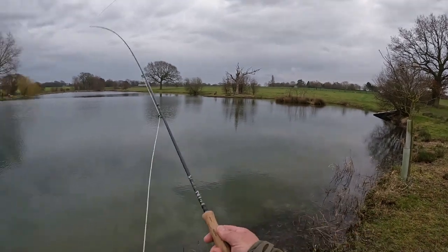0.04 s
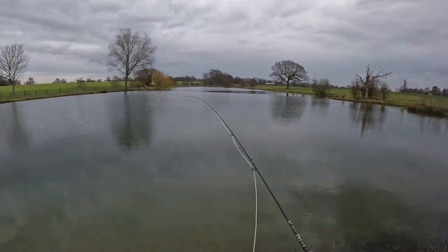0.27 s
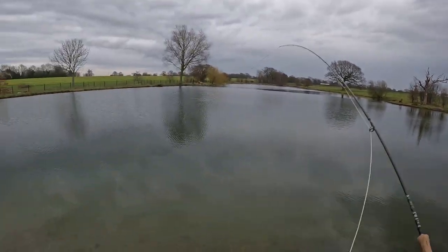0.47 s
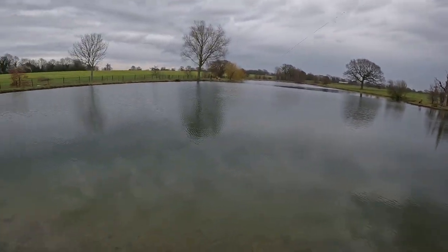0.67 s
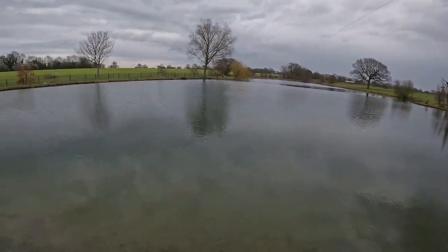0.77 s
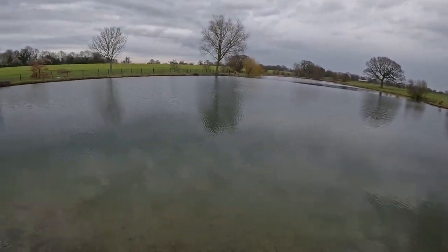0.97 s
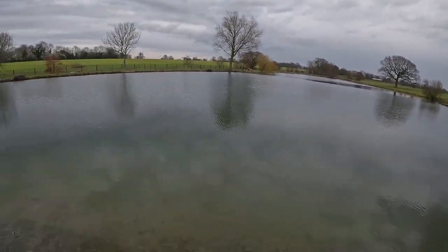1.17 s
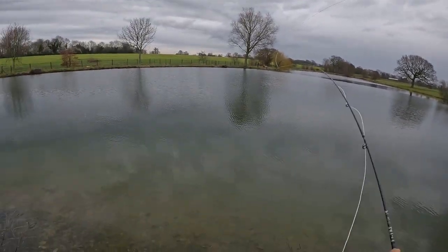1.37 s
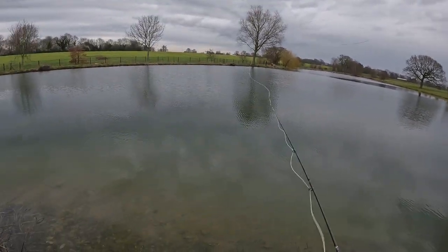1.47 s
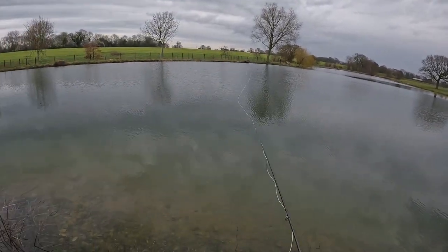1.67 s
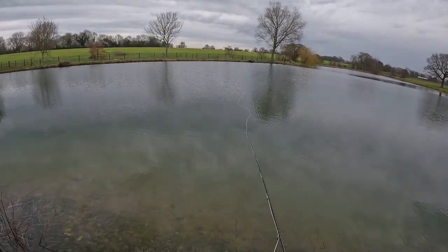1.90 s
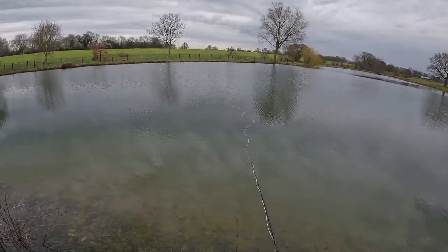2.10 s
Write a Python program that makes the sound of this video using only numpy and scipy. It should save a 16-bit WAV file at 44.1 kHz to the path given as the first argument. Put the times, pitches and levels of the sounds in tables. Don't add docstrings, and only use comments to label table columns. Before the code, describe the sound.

A fly line hisses through rod rings on the lift, goes nearly quiet with a faint swish, then shoots out louder and rougher; jacket rustles, soft knocks and wind rumble, close microphone on the caster's chest outdoors.

```python
import sys
import numpy as np
from scipy import signal
from scipy.fft import rfft, irfft, next_fast_len
from scipy.io import wavfile

SR = 44100
rng = np.random.default_rng(int(sys.argv[2]) if len(sys.argv) > 2 else 0)


def attenuation_scalar(level_db):
    decades = np.asarray(level_db, float) / 20
    return 10 ** decades


def materialize(psi):
    bounded = np.clip(np.atleast_2d(psi).T, -1, 1)
    quanta = np.round(bounded * 32767).astype(np.int16)
    wavfile.write(sys.argv[1], SR, quanta)


N = 94506

# pitch_hz, width_hz, level_db
LIFT_RINGS = [(3430, 960, -4.5), (3970, 330, -11), (4660, 870, -2), (5580, 620, -3.5), (6950, 1000, -2.5),
              (7570, 950, -8.5), (8920, 1200, -9.5)]
# pitch_hz, width_hz, level_db
SHOOT_RINGS = [(2630, 180, -2.5), (3490, 780, 3.5), (4760, 400, 2), (5000, 220, -8), (5680, 500, 0.5),
               (6620, 1760, -2.5), (8300, 520, -12)]
SLIPS_PER_S, SLIP_SPREAD_DB, RINGS_TOP_HZ = 6000, 2.5, 10330
# time_s, level_db, tilt_db_per_octave
LIFT_STROKE = [
    (0, -68.5, -2),
    (.05, -63, -7.5),
    (.16, -58, 0.3),
    (.36, -58, 0.2),
    (.5, -64, 6),
    (.58, -64.5, 5),
    (.605, -74, 4),
    (.64, -74, -9),
]
# time_s, level_db, tilt_db_per_octave
TAKE_UP_STROKE = [
    (1.16, -77.5, 11),
    (1.19, -69, 7),
    (1.215, -66.5, -10),
    (1.225, -61, 2),
    (1.29, -62, -2.5),
    (1.32, -75, -14),
    (1.34, -58, -2),
]
# time_s, level_db, tilt_db_per_octave
SHOOT_STROKE = [
    (1.3, -64, 2),
    (1.4, -56, 1),
    (1.44, -55, 8),
    (1.54, -52, -2),
    (1.56, -56.5, 1),
    (1.68, -57.5, 6),
    (1.74, -58.5, 2.5),
    (1.89, -58, -0.5),
    (1.925, -74, -23),
]
# time_s, gain_db
SNAGS = [(1.382, 2), (1.415, 5), (1.499, 4), (1.537, 3.5), (1.58, 5), (1.617, 0), (1.664, 6), (1.685, 4.5),
         (1.766, 6.5), (1.797, 6.5), (1.83, 8), (1.847, 4), (1.87, 3), (1.89, 5)]
SNAG_LENGTH_S = 0.0084
# start_s, length_s, pitch_hz, width_hz,
# level_db
RING_SONGS = [(0.042, 0.53, 13200, 4000, -78), (0.1093, 0.05, 490, 190, -56), (.3, 0.27, 3390, 300, -71.5),
              (.12, .4, 5620, 300, -65.5), (.6, .2, 5600, 580, -79), (0.046, .05, 7200, 500, -68),
              (0.326, 0.096, 4000, 170, -69), (1.53, 0.073, 115, 82, -58.5), (0.15, 0.3, 6900, 400, -68),
              (.15, 0.38, 4850, 400, -65), (.46, 0.13, 5500, 990, -71), (0.314, .2, 220, 140, -69.5),
              (0.43, 0.18, 8800, 2500, -72.5), (.55, .03, 6500, 500, -70), (1.03, 0.092, 3480, 5000, -73),
              (1.335, 0.12, 4700, 500, -64.5), (1.33, 0.081, 7300, 1700, -64),
              (1.35, 0.12, 3530, 800, -60.5), (1.41, 0.04, 6800, 300, -61), (1.415, 0.073, 8260, 700, -63),
              (1.445, 0.045, 5000, 1400, -61), (1.45, .025, 3100, 370, -62.5),
              (1.565, 0.11, 7500, 1800, -66), (1.495, 0.026, 8300, 140, -61), (1.495, .025, 7500, 400, -60),
              (1.572, 0.043, 5250, 910, -57), (1.62, 0.1, 5350, 1500, -64), (1.32, 0.63, 13000, 6000, -76),
              (1.725, .025, 2500, 130, -66), (1.76, 0.13, 6200, 1400, -61.5), (1.8, 0.08, 4640, 780, -67),
              (1.77, 0.12, 3450, 320, -64.5), (1.66, 0.075, 3600, 350, -63), (1.66, 0.026, 6100, 400, -66)]
# start_s, length_s, pitch_hz, width_hz, level_db
PUFFS = [(.21, .035, 13700, 2500, -74), (0.582, 0.027, 15100, 800, -75), (.63, 0.16, 14000, 3500, -74.5),
         (.645, .04, 5850, 500, -75), (.75, .014, 5060, 300, -76), (.778, .014, 5700, 300, -73),
         (.795, 0.022, 6200, 600, -74), (0.97, .02, 14500, 2500, -82), (1.192, 0.0022, 7500, 5000, -70),
         (1.209, 0.0022, 9500, 4000, -66), (1.223, 0.0038, 2980, 2500, -56), (1.232, .013, 13600, 600, -74),
         (1.34, 0.13, 13900, 3500, -74), (1.903, 0.0035, 6350, 3970, -59), (1.955, 0.004, 3700, 1500, -62),
         (1.978, 0.0053, 5000, 4000, -69), (2.022, 0.0048, 3560, 600, -69),
         (2.068, 0.0049, 5440, 7000, -68.5), (2.07, 0.035, 14000, 4000, -78)]
# start_s, length_s, pitch_hz, level_db
WHISTLES = [
    (.592, .038, 5800, -79),
    (.7, .05, 5560, -77),
    (.836, .05, 5480, -78.5),
]
WHISTLE_SAG_HZ_PER_S, WHISTLE_WOBBLE_HZ = 14500, 60
SWISH_START_S, SWISH_LENGTH_S = 0.52, 0.38
SWISH_HZ, SWISH_WIDTH_HZ, SWISH_DB = 5150, 2400, -70.5
# time_s, level_db
ARM = [(0, -58), (.04, -59), (.13, -57.5), (.24, -60), (.42, -68.5), (.57, -64), (.68, -61), (.8, -63),
       (.98, -67.5), (1.04, -62), (1.16, -62), (1.3, -57.5), (1.46, -57.5), (1.74, -56.5), (1.79, -60),
       (1.9, -53), (2.02, -57.5), (2.14, -52.5)]
# freq_hz, density_db_per_hz
RUSTLE = [(59, -15), (100, -1.5), (261, -6.5), (407, -6.5), (829, -10), (1230, -14), (1390, -14.5),
          (7000, -37.5), (9100, -69), (15400, -120)]
# start_s, peak_db, pitch_hz, length_cycles
KNOCKS = [(.127, -39.5, 528, 2.8), (.498, -58, 2190, 6), (0.599, -48.5, 1250, 7.6), (0.599, -52, 317, 2.8),
          (0.599, -59.5, 3360, 16), (.599, -45, 810, 2.7), (.718, -49, 380, 2), (.718, -41, 610, 2.8),
          (0.7193, -57, 1310, 7.7), (.929, -54.5, 1310, 3), (.931, -52, 630, 2.3), (1.222, -48, 188, 2.4),
          (1.585, -45.5, 1800, 7.1), (1.676, -43, 710, 2), (1.68, -50, 1900, 6.1), (1.716, -45, 1050, 2.9),
          (1.803, -53, 920, 3), (1.836, -46, 1250, 2.7), (1.966, -47, 900, 3), (2.052, -49, 735, 2.8),
          (2.076, -45, 750, 3.6), (2.1, -50, 606, 4.5), (.129, -51, 1140, 5), (.06, -47.5, 120, 3.5),
          (1.585, -45, 112, 3.6)]
THUMP_S, THUMP_HEIGHT, THUMP_RETURN_S = 1.2597, -0.026, 0.011
HOUSING_HZ, HOUSING_WIDTH_HZ, PADDING_HZ = 430, 110, 800
# time_s, level_db
GUST = [(0.0, -41), (0.31, -50.5), (0.55, -42), (0.79, -43), (1.12, -46), (1.23, -40.5), (1.38, -50.5),
        (1.62, -47.5), (1.76, -39.5), (1.92, -42), (2.14, -46.5)]
# freq_hz, density_db_per_hz
WIND = [(1.8, -0.5), (3.0, 6), (19, -3.5), (86, -20.5), (200, -42.5), (260, -71), (440, -120)]
# peak_s, half_length_s, signed_height
SHOVES = [
    (0.289, 0.007, -0.016),
    (0.972, 0.026, -0.0185),
    (1.304, 0.029, 0.051),
    (1.357, 0.023, -0.033),
    (1.974, 0.087, -0.023),
]
# freq_hz, density_db_per_hz
STEADY_HISS = [(590, -47), (1000, -11), (1220, -9), (2900, -14), (3140, -12.5), (3400, -12.5), (4140, -14),
               (15800, -22)]
STEADY_HISS_DB = -73


def rms_one(x):
    return x / np.sqrt(np.mean(x ** 2) + 1e-20)


def in_time(rows, outside=None):
    time_s, value = np.transpose(rows)
    return np.interp(np.arange(N) / SR, time_s, value, outside, outside)


def drift(rate_hz):
    r = np.exp(-80 * np.pi * rate_hz / SR)
    white = rng.standard_normal(N // 40 + 2002)
    slow = signal.lfilter([1], [1, -2 * r, r * r], white)[2000:]
    return np.interp(np.arange(N) / 40, np.arange(len(slow)), rms_one(slow))


def two_pole(hz, width_hz):
    r = np.exp(-np.pi * width_hz / SR)
    return r, [1, -2 * r * np.cos(2 * np.pi * hz / SR), r * r]


def resonate(x, hz, width_hz):
    r, poles = two_pole(hz, width_hz)
    return signal.lfilter(np.array([1, 0, -1]) * (1 - r * r) / 2, poles, x + 1e-18)


def lowpass(x, order, hz):
    return signal.sosfilt(signal.butter(order, hz, fs=SR, output="sos"), x)


def swell(start_s, length_s):
    return np.sin(np.pi * np.clip((np.arange(N) / SR - start_s) / length_s, 0, 1))


def banded_noise(spectrum, patchy_db, rate_hz):
    hz, db = np.transpose(spectrum)
    size = next_fast_len(N)
    freq = np.fft.rfftfreq(size, 1 / SR) + 1e-3
    shaped = rfft(rng.standard_normal(size)) * attenuation_scalar(np.interp(np.log(freq), np.log(hz), db))
    out, together = 0, drift(rate_hz)
    for centre_octave in np.arange(np.floor(np.log2(hz[0])), np.log2(hz[-1]) + 0.5, 0.5):
        window = np.clip(1 - 2 * np.abs(np.log2(freq) - centre_octave), 0, 1)
        band = irfft(shaped * window, size)[:N]
        out = out + band * attenuation_scalar(patchy_db * (0.067 * together + drift(rate_hz)))
    return rms_one(out)


def sliding_line(stroke, rings, patchy_db, judder_db):
    time_s, level_db, tilt_db = np.transpose(stroke)
    judder = attenuation_scalar(judder_db * drift(52))
    tilt = in_time(np.c_[time_s, tilt_db])
    out = 0
    for hz, width_hz, db in rings:
        hits = rng.random(N) < SLIPS_PER_S / SR
        strength = attenuation_scalar(SLIP_SPREAD_DB * np.minimum(rng.exponential(1, N), 3))
        slips = hits * strength * rng.choice([-1, 1], N)
        ring = resonate(resonate(slips, hz, width_hz), hz, 6.9 * width_hz)
        out = out + attenuation_scalar(db + tilt * np.log2(hz / 5000) + patchy_db * drift(30)) * ring
    out = lowpass(out, 4, RINGS_TOP_HZ)
    return attenuation_scalar(in_time(np.c_[time_s, level_db], -120)) * rms_one(out * judder)


def snags():
    return attenuation_scalar(sum(db * swell(s - SNAG_LENGTH_S / 2, SNAG_LENGTH_S) for s, db in SNAGS))


def puffs(rows):
    white = rng.standard_normal(N)
    out = np.zeros(N)
    for start_s, length_s, hz, width_hz, db in rows:
        tone = rms_one(resonate(resonate(white, hz, width_hz), hz, width_hz))
        out += attenuation_scalar(db) * swell(start_s, length_s) ** 0.5 * tone
    return out


def free_line():
    t = np.arange(N) / SR
    swish = rms_one(resonate(rng.standard_normal(N), SWISH_HZ, SWISH_WIDTH_HZ))
    out = attenuation_scalar(SWISH_DB) * swell(SWISH_START_S, SWISH_LENGTH_S) ** 0.5 * swish
    wobble_hz = WHISTLE_WOBBLE_HZ * drift(150)
    for start_s, length_s, hz, db in WHISTLES:
        sag_s = np.clip(t - start_s, 0, length_s) ** 1.3 / length_s ** 0.3
        pitch_hz = hz - WHISTLE_SAG_HZ_PER_S * sag_s + wobble_hz
        tone = np.sin(2 * np.pi * np.cumsum(pitch_hz) / SR)
        out += attenuation_scalar(db + 9.5) * swell(start_s, length_s) ** 0.5 * tone
    return out


def jacket():
    return attenuation_scalar(in_time(ARM) + 1.0) * banded_noise(RUSTLE, patchy_db=1.5, rate_hz=13.7)


def knocks(attack_per_cycle):
    t, out = np.arange(N) / SR, np.zeros(N)
    for start_s, db, hz, cycles in KNOCKS:
        age_cycles = np.clip(t - start_s, 0, 1) * hz
        attack = (1 - np.exp(-age_cycles * attack_per_cycle)) ** 2
        decay = np.exp(-np.log(1000) * age_cycles / cycles / 2)
        out += attenuation_scalar(db + 6.0) * attack * decay * np.sin(2 * np.pi * age_cycles) * (t < start_s + 1)
    return out


def thump():
    age_s = np.arange(N) / SR - THUMP_S
    pull = THUMP_HEIGHT * (age_s > 0) * np.exp(-np.abs(age_s) / THUMP_RETURN_S)
    _, spring = two_pole(HOUSING_HZ, HOUSING_WIDTH_HZ)
    bounce = signal.lfilter([sum(spring)], spring, pull + 1e-18)
    return lowpass(bounce, 2, PADDING_HZ)


def wind():
    shoves = sum(height * swell(s - half_s, 2 * half_s) ** 2 for s, half_s, height in SHOVES)
    return attenuation_scalar(in_time(GUST) + 2.5) * banded_noise(WIND, patchy_db=3.0, rate_hz=18) + shoves


def steady_hiss():
    return attenuation_scalar(STEADY_HISS_DB + 1.0) * banded_noise(STEADY_HISS, patchy_db=-1.6, rate_hz=24)


def scene():
    lift = sliding_line(LIFT_STROKE, LIFT_RINGS, patchy_db=1.2, judder_db=0.5)
    take_up = sliding_line(TAKE_UP_STROKE, SHOOT_RINGS, patchy_db=0.5, judder_db=1.0)
    shoot = snags() * sliding_line(SHOOT_STROKE, SHOOT_RINGS, patchy_db=1.0, judder_db=1.4)
    line = lift + take_up + shoot + puffs(RING_SONGS) + puffs(PUFFS) + free_line()
    body = jacket() + knocks(attack_per_cycle=5.7) + thump()
    return (line + body + wind() + steady_hiss())[None, :]


def top_cut(x):
    return signal.sosfilt(signal.butter(12, 15730, fs=SR, output="sos"), x)


def record(dry):
    return top_cut(dry)


dry = scene()
out = record(dry)
materialize(out)
```